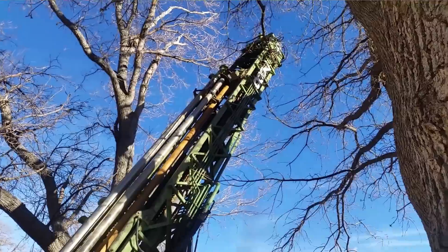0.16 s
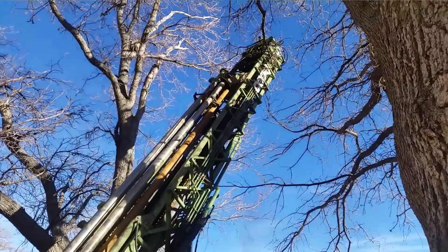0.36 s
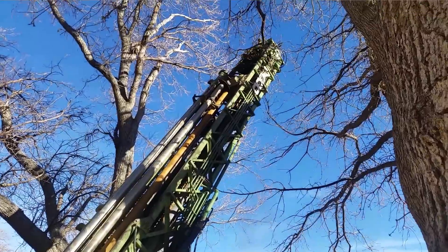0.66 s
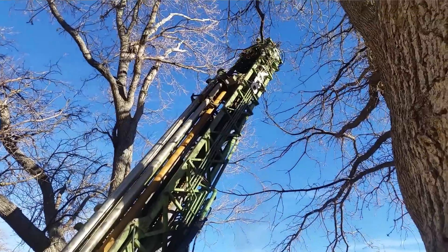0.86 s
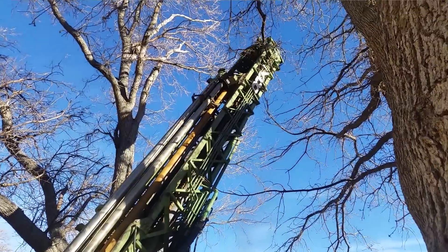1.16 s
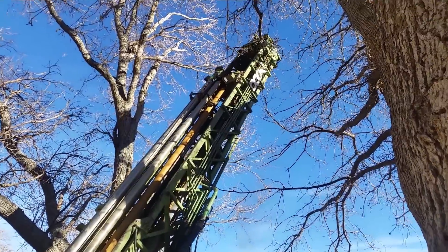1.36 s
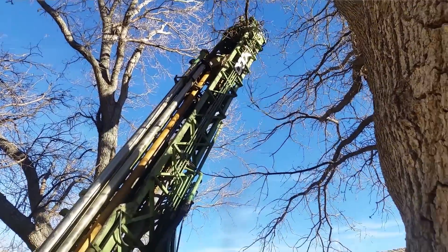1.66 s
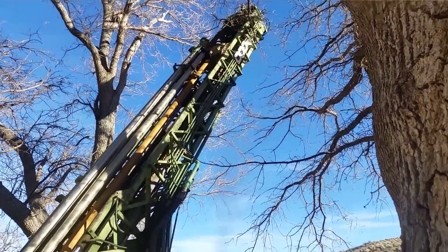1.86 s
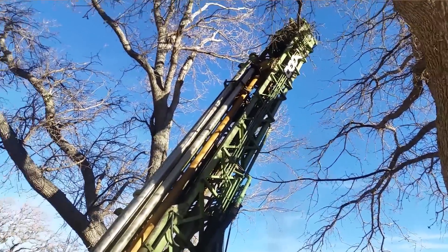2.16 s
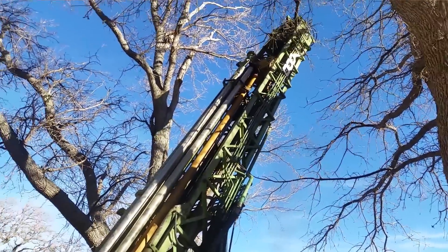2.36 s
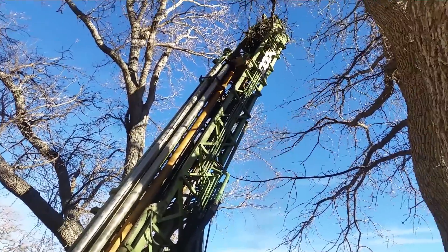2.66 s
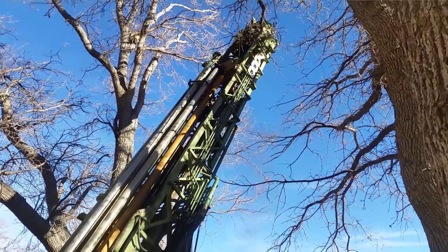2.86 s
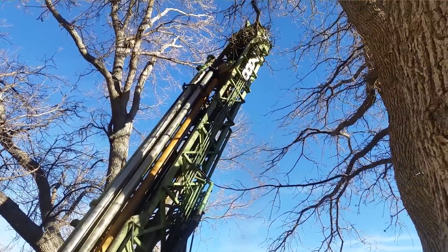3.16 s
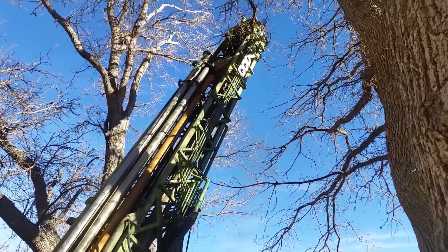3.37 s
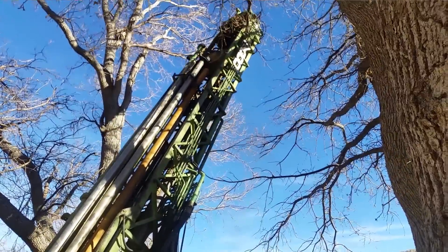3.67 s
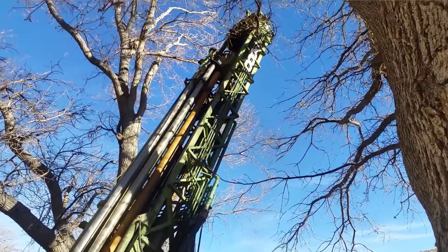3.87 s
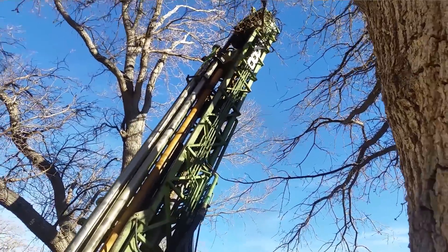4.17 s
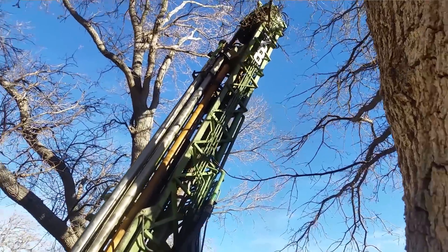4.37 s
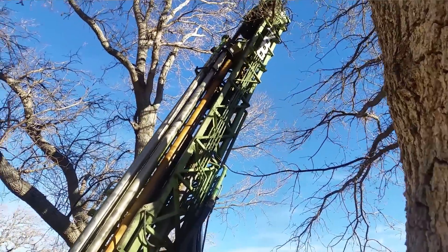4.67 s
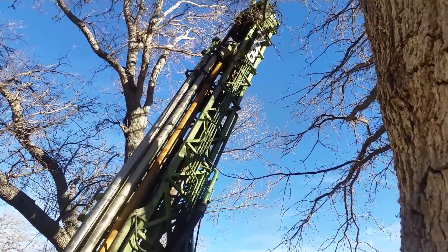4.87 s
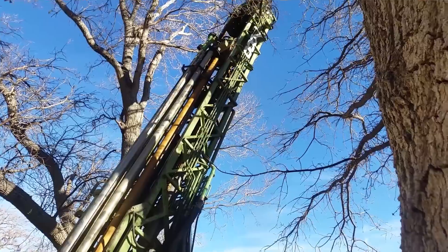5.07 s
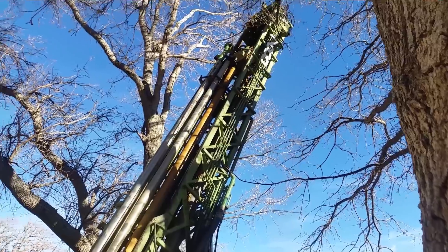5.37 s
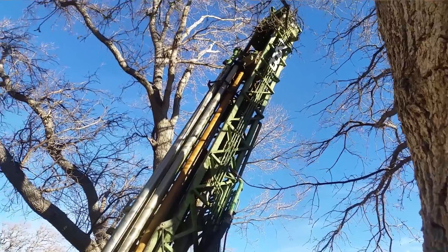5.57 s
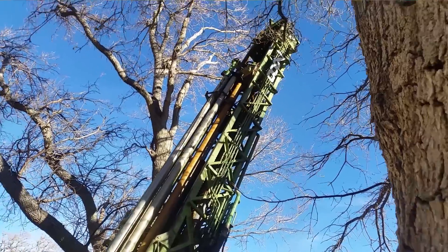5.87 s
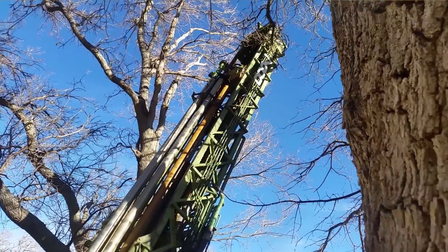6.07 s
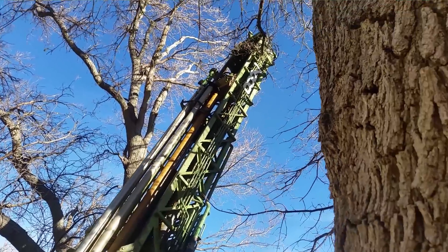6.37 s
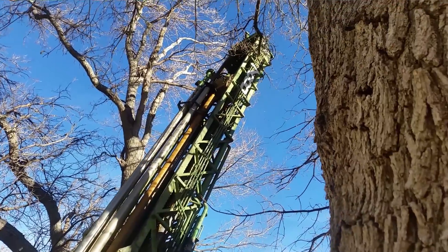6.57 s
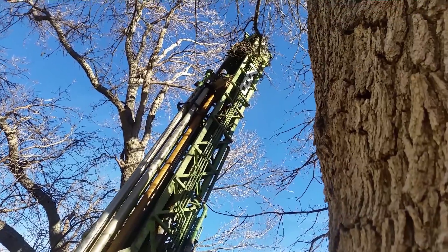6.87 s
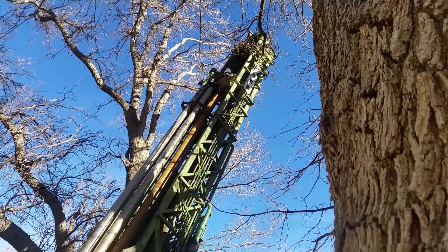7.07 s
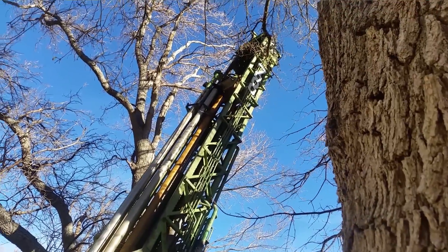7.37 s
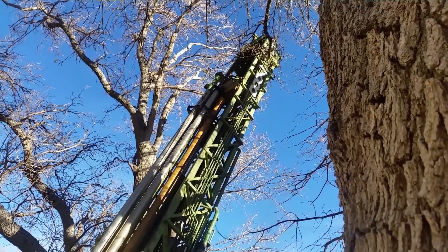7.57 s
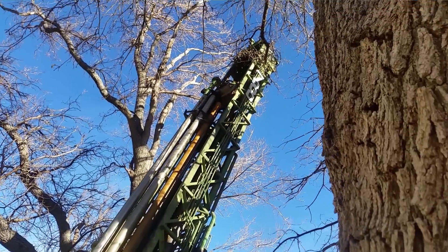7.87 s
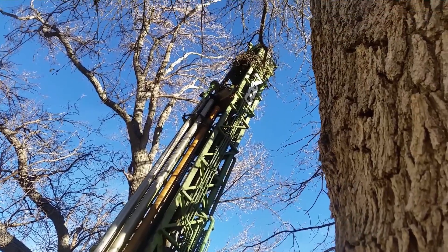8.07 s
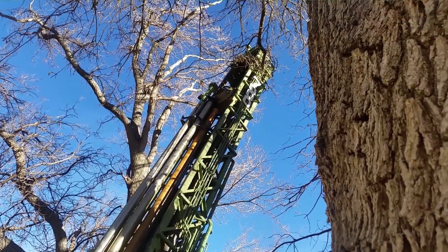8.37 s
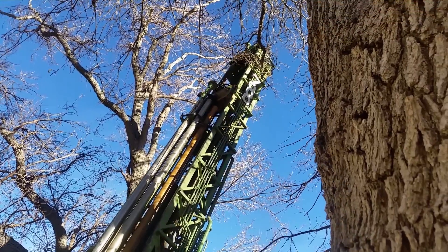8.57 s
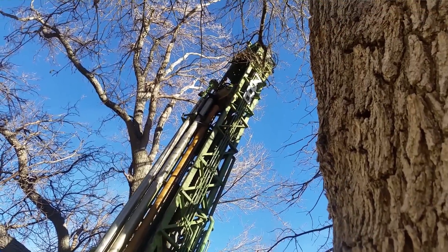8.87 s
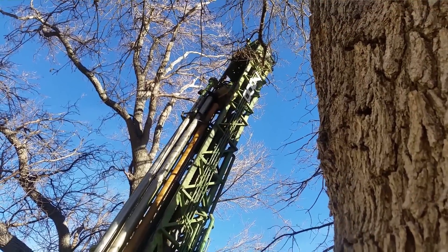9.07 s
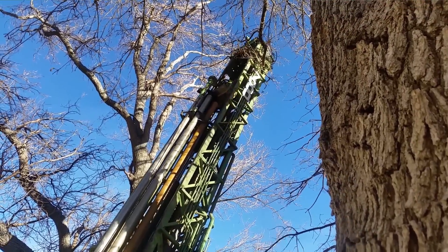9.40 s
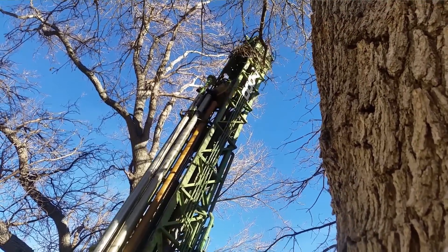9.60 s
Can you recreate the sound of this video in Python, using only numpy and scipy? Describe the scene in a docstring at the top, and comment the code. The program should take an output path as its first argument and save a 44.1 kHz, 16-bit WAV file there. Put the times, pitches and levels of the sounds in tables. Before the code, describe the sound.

A truck-mounted drilling rig runs outdoors, its diesel engine humming low with a fast metallic clatter and rattle. A bright hiss of escaping air continues above it. The engine labours and knocks at first, then picks up slightly and runs more freely. The sound swells and dips gently as the microphone moves, and past the middle a tree trunk shades the hiss on the right.

```python
"""A labouring, knocking diesel under a bright, steady hiss of escaping air: a truck-mounted drilling rig
outdoors. Its six cylinders, at about 1100 rpm, drive the exhaust hum and roar, shake the block and make
slack parts strike in every cycle, more of them hard under load. After two seconds it picks up a little;
the cooling fan slows and speeds up again, and a pump hums along. The rig swells and fades as the listener
moves, and near six seconds a tree trunk comes close on the right and screens that ear from the hiss."""
import sys
import numpy as np
from scipy import signal
from scipy.fft import rfft, irfft, next_fast_len
from scipy.io import wavfile
from scipy.ndimage import map_coordinates

SR = 44100
rng = np.random.default_rng(int(sys.argv[2]) if len(sys.argv) > 2 else 0)


def unload_wav(signal):
    """Save mono or channel-first audio to the path in sys.argv[1] as 16-bit WAV at rate SR, clipped to [-1, 1]."""
    wavfile.write(
        sys.argv[1],
        SR,
        np.round(np.clip(np.atleast_2d(signal).T, -1, 1) * 32767).astype(np.int16),
    )


N = 429534
FFT_SIZE = next_fast_len(N)
BIN_HZ = np.fft.rfftfreq(FFT_SIZE, 1 / SR)
CYLINDERS = 6  # firings in one two-turn engine cycle

# how hard the engine works: t/s, load (1 labouring, 0.5 easing, 0 running free)
ENGINE_LOAD = [(0, 1), (2.1, 1), (2.7, .5), (4, .5), (5.4, 0), (9.74, 0)]
# stereo image of the engine noise: f/Hz, left-right likeness (0 unrelated, 1 alike)
ENGINE_LIKENESS = [(60, 0.41), (130, 0.75), (290, 0.99), (640, 1), (1100, 0.85), (1700, 0.25), (3000, 0.49),
                   (8000, 0.14)]


def from_db(db):
    """Decibels to gain."""
    return np.exp(np.asarray(db) * (np.log(10) / 20))


def rms_one(x):
    """Scale to an rms of 1."""
    return x / np.sqrt(np.mean(x ** 2) + 1e-20)


def in_time(rows):
    """The columns of a curve at every sample."""
    times, *columns = np.transpose(rows)
    return np.array([np.interp(np.arange(N) / SR, times, c) for c in columns])


def in_hz(rows):
    """The columns of a spectrum at every FFT bin."""
    hz, *columns = np.transpose(rows)
    return np.array([np.interp(np.log(BIN_HZ + 1), np.log(hz), c) for c in columns])


def shaped(x, gain):
    """Filter by a gain per FFT bin; rms 1."""
    return rms_one(irfft(rfft(x, FFT_SIZE) * gain, FFT_SIZE)[..., :N])


def drift(rate_hz, hop=40):
    """Slow random wander with a spread of 1."""
    r = np.exp(-2 * np.pi * hop * rate_hz / SR)
    slow = signal.lfilter([1], [1, -2 * r, r * r], rng.standard_normal(N // hop + 2002))[2000:]
    return np.interp(np.arange(N) / hop, np.arange(len(slow)), rms_one(slow))


def tone(turns, db):
    """A sine of the given rms level that falls through zero at every whole turn."""
    return -np.sqrt(2) * from_db(db) * np.sin(2 * np.pi * turns)


def at_ears(pair, spectrum, likeness):
    """Two unrelated signals become one coloured, partly alike stereo sound; rms 1."""
    # phase between the ears: f/Hz, lead of the left/rad
    left_lead = [(20, 0), (1150, -0.5), (1700, 0.52), (2700, -1.5), (3500, -3), (4700, -6), (7300, -6),
                 (9200, -8), (10100, -3.5), (11000, -5.5), (13200, -6.5), (16000, -8.5)]
    alike = np.clip(likeness, 0, 1)
    mid, side = rfft(pair, FFT_SIZE)
    ears = np.sqrt(1 + alike) * mid + np.sqrt(1 - alike) * side * [[1], [-1]]
    ears = ears * from_db(in_hz(spectrum)) * np.exp(1j * in_hz(left_lead) * [[0], [-1]])
    return rms_one(irfft(ears, FFT_SIZE)[:, :N])


def load_blend():
    """How far the engine is labouring, easing and running free; the three shares sum to 1."""
    load = in_time(ENGINE_LOAD)[0]
    labouring, free = np.maximum(2 * load - 1, 0), np.maximum(1 - 2 * load, 0)
    return np.array([labouring, 1 - labouring - free, free])


def frame_gain():
    """Narrow resonances lift whichever engine partials the speed brings into them."""
    # ringing panels and frame: f/Hz, width/Hz, lift/dB
    modes = [(820, 14, 3), (891, 8, 5), (1000, 45, 3.5), (1740, 50, 3)]
    return 1 + sum((from_db(db) - 1) / (1 + 2j * (BIN_HZ - hz) / width) for hz, width, db in modes)


def exhaust_hum(firings, firing_db=-32.0, waver_db=0.83, throb_db=0.24):
    """The firing pulse with its overtones, and the weaker partials of unequal cylinders between them."""
    # octave of the firing tone, strong while labouring: t/s, level/dB
    octave = [(0, -35), (1.5, -33), (2.4, -35), (2.8, -39), (3.7, -36), (4.3, -47), (5.6, -56), (5.9, -47),
              (9.74, -43.5)]
    # upper partials: multiple of the cycle rate, labouring/dB, easing/dB, running free/dB
    partials = [(15, -46.5, -52, -49), (16, -57, -43.5, -52), (17, -49.5, -60, -60), (18, -42.5, -54, -60),
                (20, -53, -58, -55), (22, -50.5, -57, -58), (23, -51, -60, -60), (24, -44.5, -44.5, -47.5),
                (26, -49.5, -46, -51.5), (28, -56, -51, -55.5), (36, -56, -55, -50.5),
                (58, -64, -56, -54.5), (75, -64, -60, -54.5), (95, -55, -66, -66), (99, -67, -59, -70),
                (102, -55, -68, -68), (112, -64, -58, -64), (224, -52, -62, -70)]
    blend, cycles = load_blend(), firings / CYLINDERS
    hum = tone(firings, firing_db + throb_db * drift(7.2))
    hum += tone(2 * firings, in_time(octave)[0] + throb_db * drift(1.5))
    for multiple, *levels_db in partials:
        level_db = np.array(levels_db) @ blend + waver_db * drift(1.6)
        # overtones of the firing rate line up into a sawtooth; the others take any phase
        offset = rng.random() * (multiple % CYLINDERS > 0)
        hum += tone(multiple * cycles + offset, level_db)
    return irfft(rfft(hum, FFT_SIZE) * frame_gain(), FFT_SIZE)[:N]


def cooling_fan(load, db_per_hz=0.2, load_db=-11, waver_db=0.6):
    """The fan slips on its clutch and keeps its own speed: louder when fast, weaker under load."""
    # blade-passing rate: t/s, f/Hz
    blade_rate = [(0, 84), (1.5, 82.7), (3.4, 63.5), (5, 67.8), (6.2, 79.6), (7.1, 82), (7.7, 83.8),
                  (8.3, 83), (9.74, 75.7)]
    blade_hz = in_time(blade_rate)[0]
    level_db = -42 + db_per_hz * (blade_hz - 79) + load_db * load
    return tone(np.cumsum(blade_hz) / SR, level_db + waver_db * drift(3.1))


def pump(firings, trim_db=-1.0, waver_db=0.6):
    """Geared to the crank, the pump hums on two partials that grow with its effort."""
    # pump hum: multiple of the firing rate, level/dB
    partials = [(5.14, -50), (7.71, -55.5)]
    # how hard it pumps: t/s, gain/dB
    effort = [(0, -11), (4, -8), (5.2, 1), (9.74, -0.5)]
    effort_db = in_time(effort)[0] + trim_db
    return sum(tone(multiple * firings, db + effort_db + waver_db * drift(2.3))
               for multiple, db in partials)


def cycle_noise(firings, repeat_share, uneven_db=3.0, size=4800, above_partial=28):
    """Two noises of which a share repeats every engine cycle, as a comb of uneven high partials."""
    partials = rfft(rng.standard_normal((2, size)))
    high = np.arange(partials.shape[1]) > above_partial
    uneven = from_db(uneven_db * rng.standard_normal(partials.shape[1]))
    pattern = rms_one(irfft(high * partials / np.abs(partials) * uneven))
    place = (firings / CYLINDERS * size).astype(int) % size
    fresh = rng.standard_normal((2, N))
    return np.sqrt(repeat_share) * pattern[:, place] + np.sqrt(1 - repeat_share) * fresh


def jolts(firings, depth_db):
    """A gain that jumps with each firing, by an amount of that cylinder's own."""
    # accent of each cylinder, in firing order: gain/dB
    accents = [-.6, .3, 1.1, 0, -1, .6]
    cylinder = firings.astype(int) % CYLINDERS
    swell = np.sin(np.pi * np.sqrt(firings % 1)) ** 2  # fast attack, slower fall
    return from_db(swell * (depth_db + np.array(accents)[cylinder]))


def exhaust_roar(firings):
    """Turbulent exhaust gas, puffing slightly with the unequal firings."""
    # low rush of gas: f/Hz, relative level/dB
    spectrum = [(20, -25), (40, 1), (65, -1.5), (100, 3.5), (140, -1), (220, -3), (300, -11.5),
                (420, -14.5), (900, -30)]
    eddies = cycle_noise(firings, repeat_share=.15)
    return at_ears(eddies * jolts(firings, depth_db=0), spectrum, in_hz(ENGINE_LIKENESS))


def block_clatter(firings):
    """Pistons, valves and injectors repeat one pattern of contacts every cycle, never quite alike."""
    # midrange body of the block: f/Hz, relative level/dB
    spectrum = [(100, 0), (190, 2), (300, 0), (400, -5), (560, 0.6), (700, 0.5), (1020, -2.5), (1130, -1.5),
                (1350, -4), (1580, -1.5), (1750, 1), (1950, -1), (2200, -5.5), (3000, -15), (4500, -22)]
    contacts = cycle_noise(firings, repeat_share=.66) * jolts(firings, depth_db=3.5)
    return at_ears(shaped(contacts, frame_gain()), spectrum, in_hz(ENGINE_LIKENESS))


def steel_rattle(firings, surge_db=2.6):
    """Loose steel shaken by the firings: a fine, irregular rasp that comes in surges."""
    # colour of the rasp, relative levels: f/Hz, left/dB, right/dB
    spectrum = [(900, -7, -28), (1740, 9, 2), (2340, -7, -1), (3050, 12, 11), (3820, -38, 6),
                (4470, -11, -8), (6250, -1.5, -3.5), (7240, 0.5, 1), (12000, -1, -10)]
    shaking = jolts(firings, depth_db=1.5) * from_db(surge_db * drift(15.6))
    return at_ears(rng.standard_normal((2, N)) * shaking, spectrum, in_hz(ENGINE_LIKENESS))


def cover_ring(firings, ring_hz=1806, width_hz=110):
    """Every firing rings one broad resonance of a steel cover."""
    resonance = 1 / (1 + 2j * (BIN_HZ - ring_hz) / width_hz) ** 2
    contacts = cycle_noise(firings, repeat_share=.5) * jolts(firings, depth_db=5)
    return shaped(contacts, resonance)


def slack_knocks(firings, uneven_db=1.5):
    """Each slack part strikes once a cycle, never equally hard, and rings the steel around it."""
    # strikes: place in the cycle/firings, strength labouring/dB, strength otherwise/dB
    parts = [(1.25, -28, -35), (2, -31, -38), (3.03, -40, -28), (4.7, -29, -42)]
    # the struck steel: f/Hz, width/Hz, gain/dB
    modes = [(1360, 250, -7.5), (1733, 116, -5.5)]
    labouring, clicks, ringing = load_blend()[0], np.zeros(N), np.zeros(N)
    for place, labouring_db, otherwise_db in parts:
        strikes = np.flatnonzero(np.diff(np.floor((firings - place) / CYLINDERS)))
        strength_db = otherwise_db + (labouring_db - otherwise_db) * labouring[strikes]
        clicks[strikes] += from_db(strength_db + uneven_db * rng.standard_normal(len(strikes)))
    for hz, width, db in modes:
        r, w = np.exp(-np.pi * width / SR), 2 * np.pi * hz / SR
        mode = signal.lfilter([0, np.sin(w)], [1, -2 * r * np.cos(w), r * r], clicks + 1e-18)
        ringing += from_db(db) * mode
    return ringing


def wandering_peak(hiss, width_hz=750, peak_db=-8.0, rest_db=-2.0):
    """A broad peak sweeps the hiss as the listener moves; the rest sinks around it."""
    # centre of the peak: t/s, f/Hz
    centre = [(0, 11550), (1.6, 11650), (1.9, 10900), (2.45, 12100), (3.2, 11000), (3.55, 11600),
              (3.8, 11000), (4.15, 12000), (5.25, 11800), (5.6, 11000)]
    carrier = np.exp(2j * np.pi * np.cumsum(in_time(centre)[0]) / SR)
    r = np.exp(-np.pi * width_hz / SR)
    peak = 2 * np.real(carrier * signal.lfilter([1 - r], [1, -r], hiss / carrier))
    return from_db(rest_db) * hiss + from_db(peak_db) * peak


def head_turn(right):
    """The right ear hears the hiss a little later or earlier as the listener turns."""
    # extra delay at that ear: t/s, lag/samples
    lag = [(0, 0.5), (1.6, 0.7), (1.85, 1.8), (2.02, 1.6), (2.25, -0.6), (2.5, -0.6), (2.9, 0.8),
           (3.72, 1.7), (3.95, 0.7), (4.6, -0.4), (5.15, 0.3), (5.8, -2.1), (6.05, -1.9), (6.35, 0.1),
           (9.74, 0.5)]
    return map_coordinates(right, [np.arange(N) - in_time(lag)[0]], order=5, mode="nearest")


def air_hiss(top_from_hz=12520, left_top_db=-27, flutter_db=0.53):
    """A fluttering jet of air, in a body and a top band; the trunk colours it and shades the right ear."""
    # colour of the jet, relative levels: f/Hz, left/dB, right/dB
    spectrum = [(1500, -40, -28), (2950, -23, -8), (5550, -28, -12.5), (6280, -24.5, -25),
                (7420, -23.5, -21), (8200, -17.5, -10), (9600, -13, -1.5), (10200, -6, .5),
                (11600, .8, -1.5), (12300, -1.5, -2.5), (13100, -8, -3), (13800, -3.5, -2.5),
                (15500, -2.2, -5), (15900, -8, -12)]
    # colour added by the trunk: f/Hz, left/dB, right/dB
    trunk_colour = [(6200, 1.5, -2), (8740, 2, -2.5), (9600, -8, -4), (10200, 9.5, -3.5), (11230, 3, -2.5),
                    (12500, 5, -8.5), (13500, -8, -7), (14800, 5, -15)]
    # body of the hiss at the moving left ear: t/s, gain/dB
    left_fader = [(0, -28.5), (.76, -27.5), (1.2, -29), (1.44, -25.9), (1.8, -29.5), (2.25, -28),
                  (2.55, -27), (3.12, -26.8), (3.28, -29), (3.54, -26.5), (3.66, -28.5), (3.88, -26),
                  (4.15, -26), (4.4, -28.5), (5.25, -28), (5.56, -26), (5.78, -30), (5.92, -25.5),
                  (6.95, -26.5), (7.65, -24), (8.4, -27), (9, -25), (9.74, -26)]
    # the hiss at the right ear: t/s, gain/dB
    right_fader = [(0, -30), (.2, -27.5), (.52, -27), (.64, -28.5), (.88, -27), (1.06, -30), (1.42, -26.5),
                   (1.68, -30.5), (2.15, -29.5), (2.65, -27), (3.64, -30.5), (3.84, -27), (4.42, -27.5),
                   (4.66, -30.5), (4.82, -26.5), (5.45, -27), (5.85, -29.5), (6.05, -32.5), (6.46, -36),
                   (6.58, -34), (7, -36.5), (7.24, -34), (7.68, -34), (7.84, -37), (8.05, -35),
                   (9.74, -37.5)]
    # top band at the right ear: t/s, level against the body/dB
    right_top_fader = [(0, -3.5), (3.1, -2.5), (3.58, -7.5), (3.8, -2.5), (5.1, -2), (6.05, -1),
                       (6.8, -5.5), (9.74, -6)]
    jet = at_ears(rng.standard_normal((2, N)), spectrum, likeness=0.72)
    trunk = behind_trunk()
    top = np.clip((BIN_HZ - top_from_hz) / 400, 0, 1)  # crossover 400 Hz wide
    bands = []
    for ear, colour in zip(jet, from_db(in_hz(trunk_colour))):
        for band in (1 - top, top):
            bands.append((1 - trunk) * shaped(ear, band) + trunk * shaped(ear, band * colour))
    left_body, left_top, right_body, right_top = bands
    left_body = trunk * left_body + (1 - trunk) * wandering_peak(left_body)
    left = from_db(in_time(left_fader)[0]) * left_body + from_db(left_top_db) * left_top
    right = right_body + from_db(in_time(right_top_fader)[0]) * right_top
    right *= from_db(in_time(right_fader)[0])
    return np.array([left, head_turn(right)]) * from_db(flutter_db * drift(24.0))


def behind_trunk(from_s=5.3, to_s=6.3):
    """0 in the open, 1 once the trunk stands on the listener's right."""
    return np.clip((np.arange(N) / SR - from_s) / (to_s - from_s), 0, 1)


def scene(first_firing_s=.0128, hum_pan_db=0.26, clatter_pan_db=-0.66, surge_db=0.5):
    """One crank times the engine layers, which swell and fade together; the air hisses on its own."""
    # engine speed: t/s, firing rate/Hz
    speed = [(0, 52.5), (.8, 51.65), (1.4, 51.35), (2.1, 51.75), (2.7, 53.85), (3, 54.1), (3.6, 54.1),
             (4.6, 54.3), (5, 54.6), (5.6, 54.56), (6.6, 54.8), (9.74, 54.9)]
    # swell of the machinery at the moving listener: t/s, gain/dB
    swell = [(0.0, -1), (0.22, 0.25), (0.92, 0), (1.15, -1.5), (1.4, 0.65), (1.92, -1.5), (2.37, -0.06),
             (3.67, -1.1), (4.7, 0.5), (4.87, 1.7), (5.92, 0.7), (6.05, -1.5), (6.7, 1.3), (6.97, -1),
             (7.62, 1.7), (7.82, -2.5), (8.22, -0.6), (9.32, -3.5), (9.72, -1)]
    firing_hz, swell_db, load = in_time(speed)[0], in_time(swell)[0], in_time(ENGINE_LOAD)[0]
    firings = np.cumsum(firing_hz) / SR - first_firing_s * firing_hz[0]
    block_db = swell_db + surge_db * drift(8.5)
    shade_db = -2.5 * behind_trunk() * [[0], [1]]  # the trunk screens the rattle a little too
    hum = from_db(swell_db) * (exhaust_hum(firings) + cooling_fan(load) + pump(firings))
    hum = hum * from_db([[hum_pan_db], [-hum_pan_db]])
    # each noise fader: dB running free + what the load adds + how it follows the swell
    roar = from_db(-41 + 2 * load + 1.1 * swell_db) * exhaust_roar(firings)
    clatter = from_db(-37.5 + 1.5 * load + 1.22 * block_db) * block_clatter(firings)
    clatter *= from_db([[clatter_pan_db], [-clatter_pan_db]])
    rattle = from_db(-42 + 0.8 * load + block_db + shade_db) * steel_rattle(firings)
    ring = from_db(-53.5 + 9.5 * load + block_db) * cover_ring(firings)
    knocks = from_db(1.22 * swell_db) * slack_knocks(firings)
    return hum + roar + clatter + rattle + ring + knocks + air_hiss()


def record(dry, cutoff_hz=15850):
    """A steep low-pass takes off the very top."""
    return signal.sosfilt(signal.ellip(12, .1, 90, cutoff_hz, fs=SR, output="sos"), dry)


dry = scene()
out = record(dry)
unload_wav(out)
```